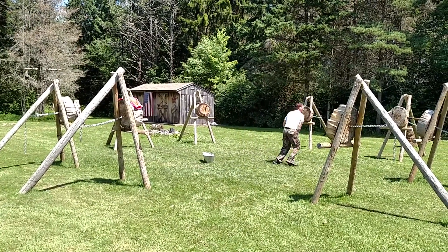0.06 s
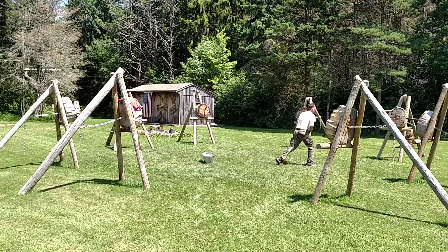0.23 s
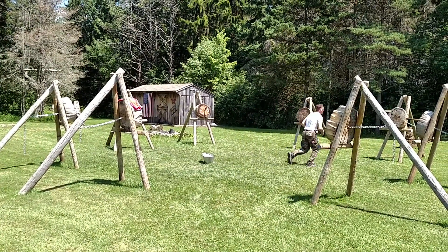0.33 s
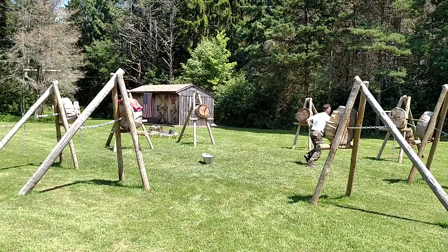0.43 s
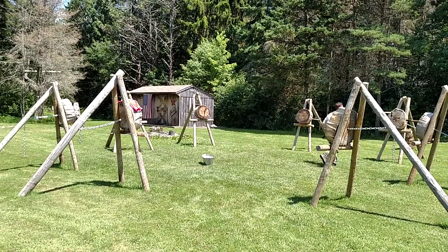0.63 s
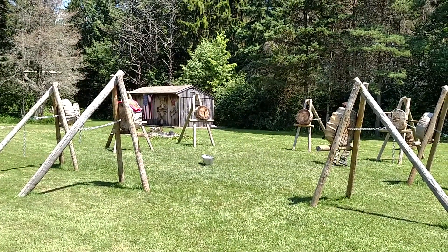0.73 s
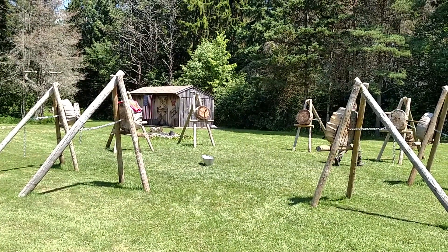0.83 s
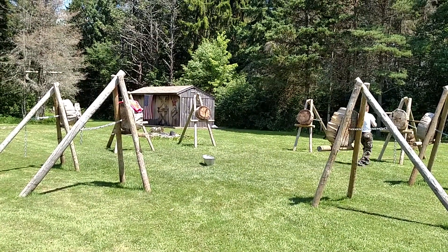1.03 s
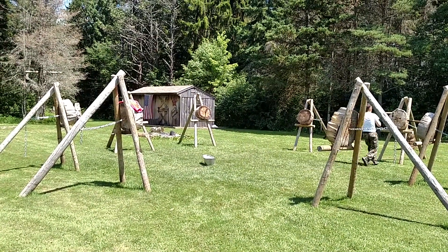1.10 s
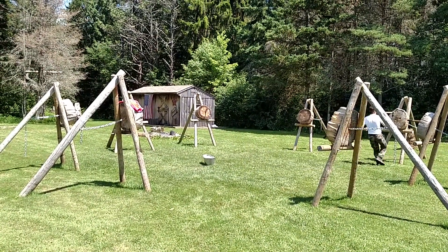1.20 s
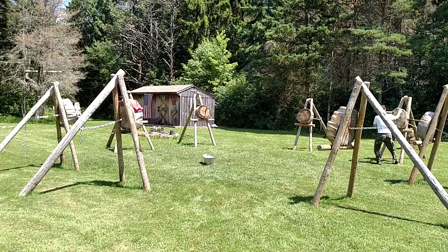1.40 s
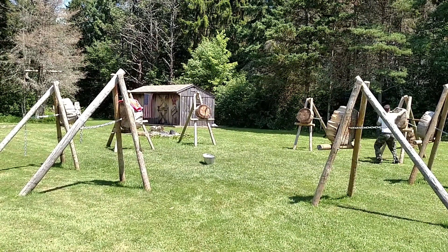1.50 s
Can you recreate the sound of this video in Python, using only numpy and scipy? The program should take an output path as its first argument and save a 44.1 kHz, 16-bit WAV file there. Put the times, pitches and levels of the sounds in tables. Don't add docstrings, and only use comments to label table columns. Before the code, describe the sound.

One sharp wooden thunk as an axe bites into a log target, a small clatter just after, a short echo off the trees, then muffled footfalls on grass over soft breeze; mono distant microphone.

```python
import sys
import numpy as np
from scipy import signal
from scipy.io import wavfile
from scipy.ndimage import uniform_filter1d

SR = 44100
rng = np.random.default_rng(int(sys.argv[2]) if len(sys.argv) > 2 else 0)


def decibels_to_gain(level_db):
    exponent = np.asarray(level_db, float) / 20
    return 10 ** exponent


def store_wav(level_fs):
    pcm = np.round(np.clip(np.atleast_2d(level_fs), -1, 1) * 32767)
    wavfile.write(sys.argv[1], SR, pcm.T.astype(np.int16))


N = 68355
BLOW_S = 0.222


def rms(x):
    return np.sqrt(np.mean(x ** 2))


def peak(x, db):
    return x * decibels_to_gain(db) / np.abs(x).max()


def band(x, hz, width_hz):
    return signal.lfilter(*signal.iirpeak(hz, hz / width_hz, fs=SR), x)


def steep(x, hz, width_hz):
    return band(band(x, hz, width_hz), hz, width_hz)


def ring(x, hz, t60):
    pole = np.exp(2j * np.pi * hz / SR - np.log(1000) / (t60 * SR))
    return signal.lfilter([1], [1, -pole], x).imag


def push(at, spread):
    t = np.arange(N) / SR - at
    return np.exp(-.5 * (t / spread) ** 2)


def late(x, s):
    return np.interp(np.arange(N) - s * SR, np.arange(N), x, left=0)


def walk(rate):
    hold = int(SR / rate)
    steps = np.repeat(rng.standard_normal(N // hold + 1), hold)
    return 1.8 * uniform_filter1d(uniform_filter1d(steps, hold), hold)[:N]


def air():
    # frequency in Hz, spectral level in dB per Hz.
    spectrum = np.array([(18, -0.5), (42, -5.5), (140, -4.5), (260, -9), (520, -16.5), (1500, -26),
                         (4500, -36.5), (15500, -47.5)])
    gust_db, flicker_db = 0.2, 0.5
    gust = walk(1.5)
    breeze = 0
    for hz in 16 * 2 ** np.arange(0, 10.1, .5):
        noise = steep(rng.standard_normal(N), hz, hz / 2)
        db = np.interp(np.log(hz), np.log(spectrum[:, 0]), spectrum[:, 1])
        swell_db = (gust_db * gust + flicker_db * walk(11.85)) * min(1, 600 / hz) ** 0.26
        breeze = breeze + decibels_to_gain(db + swell_db) * noise
    insects = steep(rng.standard_normal(N), 10380, 1100)
    insect_gain = decibels_to_gain(-82.5 + 1.0 * walk(59))
    return breeze * decibels_to_gain(-54.5) / rms(breeze) + insects * insect_gain / rms(insects)


def edge_tick():
    t = np.arange(N) / SR - BLOW_S + 0.0034
    t60_s = 0.02
    noise = steep(rng.random(N) - .5, 7550, 9800)
    return peak(noise * (t > 0) * decibels_to_gain(-60 * np.abs(t) / t60_s), -56)


def slice_boom():
    # frequency in Hz, level in dB, t60 in seconds.
    body = [(237.2, -7, 0.066), (366, -2.5, 0.026)]
    # frequency in Hz, level in dB, t60 in seconds.
    tripod = [(129, 3.5, 0.0216)]
    force = np.gradient(push(BLOW_S, 0.00082))
    boom = sum(decibels_to_gain(db) * ring(force, hz, t60) for hz, db, t60 in body)
    boom = boom - 0.68 * sum(decibels_to_gain(db) * ring(force, hz, t60) for hz, db, t60 in tripod)
    return peak(boom, -13.5)


def fibre_splits():
    splits_per_s = 8000
    return (rng.random(N) < splits_per_s / SR) * (rng.random(N) - .5)


def wood_modes(splits):
    # frequency in Hz, level in dB, t60 in seconds.
    upper_modes = [(505, -8.5, 0.031), (710, 1.5, 0.015), (950, 0, 0.046), (1126, -8.5, 0.044),
                   (1643, -0.5, 0.02), (2049, 0, 0.024), (2186, -2.5, 0.022), (2420, -7.5, 0.022),
                   (2795, -9, 0.019), (3075, -2, 0.015), (3400, -7, 0.0061), (4030, -18, 0.013),
                   (4400, -30, 0.011), (5800, -25.5, 0.015)]
    bite_s, late_s_per_octave = 0.00038, 0.0025
    wood = 0
    for hz, db, t60 in upper_modes:
        if hz < 5000:
            at = BLOW_S + late_s_per_octave * np.log2(hz / 800)
        else:
            at = BLOW_S - 3 * bite_s
        bite = splits * (push(at, bite_s) + 0.27 * push(BLOW_S + 0.0013, bite_s))
        wood = wood + peak(ring(steep(bite, hz, hz * 0.48), hz, t60), db)
    return peak(wood, -18.5)


def fibre_crackle(splits):
    return peak(steep(splits * push(BLOW_S + 0.00064, 0.00108), 2100, 1720), -35.5)


def scatter(x, db, t60, start, rise):
    t = np.maximum(np.arange(N) / SR - start, 0)
    response = rng.standard_normal(N) * (1 - np.exp(-t / rise)) * decibels_to_gain(-60 * t / t60)
    unit_energy = response / np.sqrt(np.sum(response ** 2))
    return decibels_to_gain(db) * signal.fftconvolve(x, unit_energy)[:N]


def tails(boom, wood):
    near = wood + decibels_to_gain(9.5) * steep(wood, 4260, 1270)
    far = band(wood, 1600, 780) + decibels_to_gain(-5.5) * band(wood, 730, 600) + decibels_to_gain(8.5) * steep(wood, 3790, 600)
    low = steep(boom, 122, 140)
    posts = scatter(near, db=-13, t60=0.23, start=0.0043, rise=0.0031)
    trees = scatter(far, db=-15.5, t60=0.98, start=0.064, rise=0.011)
    return posts + trees + scatter(low, db=-14.5, t60=0.68, start=0.016, rise=0.024)


def reflections(hit):
    # delay in seconds, level in dB, centre in Hz, width in Hz.
    paths = [
        (.0217, -12, 181, 305),
        (0.0857, -27, 150, 252),
    ]
    return sum(decibels_to_gain(db) * band(late(hit, s), hz, width) for s, db, hz, width in paths)


def rattles():
    # time in seconds, peak in dB, frequency in Hz, t60 in seconds.
    contacts = [(.2445, -34, 1530, 0.004), (.249, -46, 3150, 0.0073), (.261, -40, 2170, 0.0094),
                (.2615, -44, 3250, 0.013), (.267, -47, 1880, 0.022), (.2735, -45, 3540, 0.0069),
                (.2872, -33, 950, .017), (.288, -34, 550, 0.018), (.2905, -50, 3880, 0.016),
                (.2955, -38, 1360, 0.01)]
    grit = rng.standard_normal(N) * decibels_to_gain(4.1 * walk(700)) * push(0.2885, 0.0052)
    jolt = signal.lfilter(*signal.butter(3, 3600, fs=SR), band(grit, 1100, 2000))
    out = peak(jolt, -40.5)
    for s, db, hz, t60 in contacts:
        force = np.gradient(push(s, 0.25 / hz))
        out = out + peak(ring(force, hz, t60), db)
    return out


def feet():
    # time in seconds, peak in dB, frequency in Hz.
    footfalls = [
        (.389, -38.5, 150),
        (0.565, -41.5, 228),
        (0.7511, -27, 193.6),
        (0.8188, -44.5, 191),
        (1.054, -55, 190),
    ]
    thuds = 0
    for s, db, hz in footfalls:
        force = np.gradient(push(s, 0.14 / hz))
        thuds = thuds + peak(ring(force, hz, 0.012), db)
    return -signal.lfilter(*signal.butter(1, 35, "high", fs=SR), thuds)


def scene():
    background = air()
    tick = edge_tick()
    boom = slice_boom()
    splits = fibre_splits()
    wood = wood_modes(splits) + tick + fibre_crackle(splits)
    hit = boom + wood
    mix = background + hit + tails(boom, wood) + reflections(hit) + rattles() + feet()
    return mix[None]


def top_cut(x):
    return signal.sosfilt(signal.butter(12, 15640, fs=SR, output="sos"), x)


def record(dry):
    low_pass = signal.ellip(10, .2, 60, 15680, fs=SR, output="sos")
    return top_cut(signal.sosfilt(low_pass, dry))


dry = scene()
out = record(dry)
store_wav(out)
```